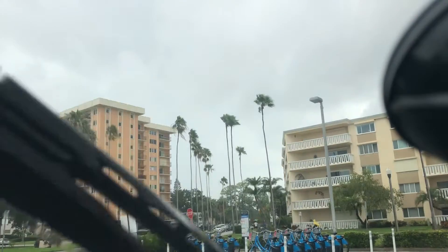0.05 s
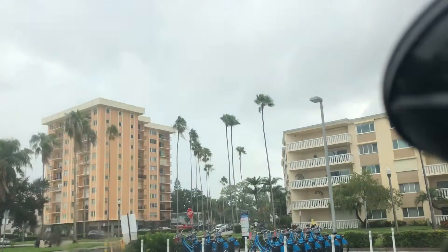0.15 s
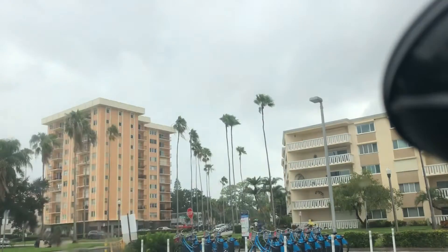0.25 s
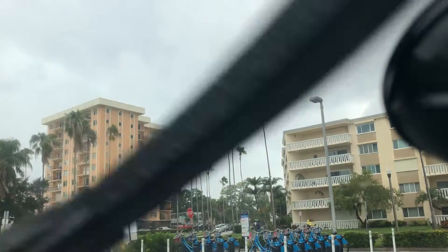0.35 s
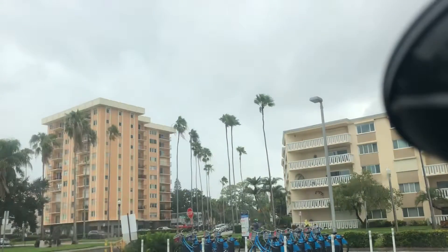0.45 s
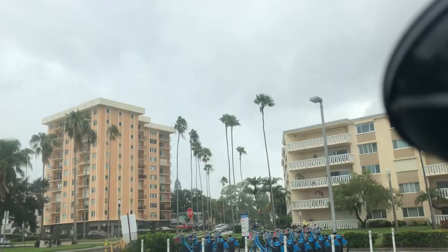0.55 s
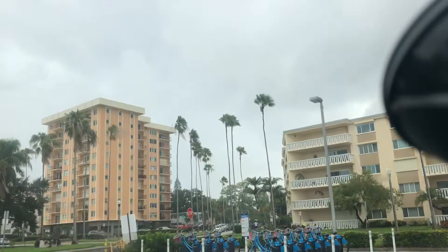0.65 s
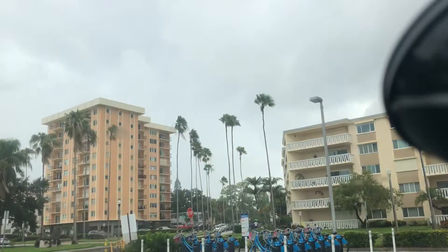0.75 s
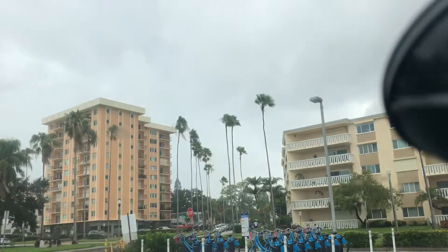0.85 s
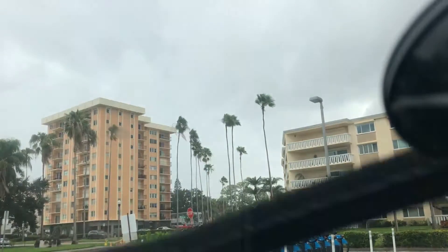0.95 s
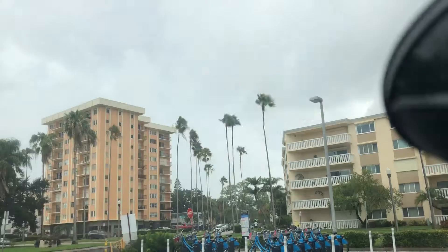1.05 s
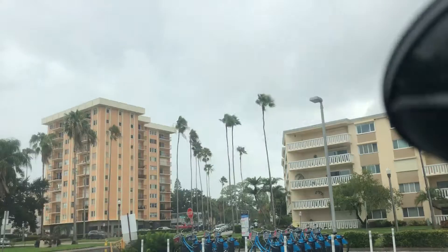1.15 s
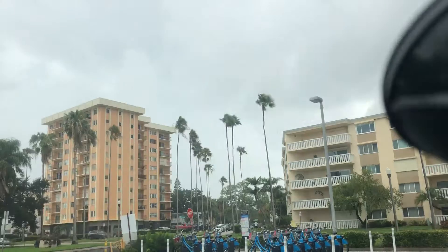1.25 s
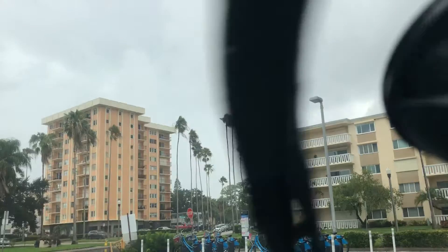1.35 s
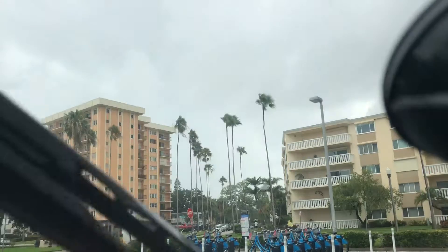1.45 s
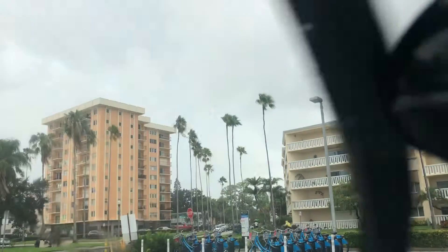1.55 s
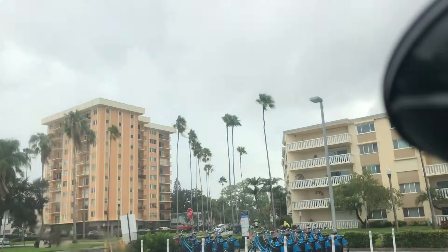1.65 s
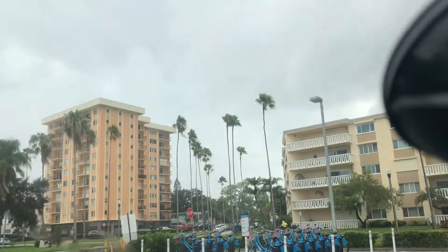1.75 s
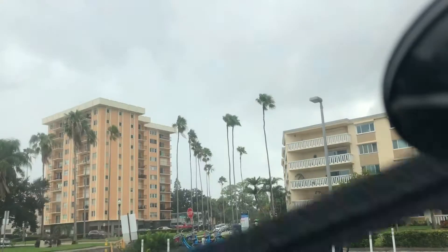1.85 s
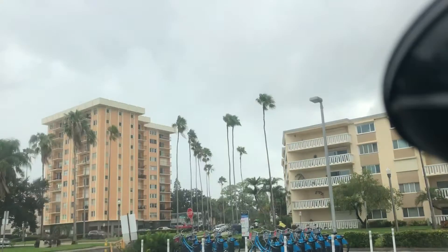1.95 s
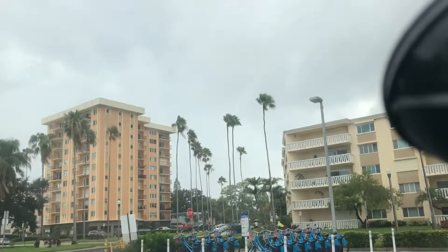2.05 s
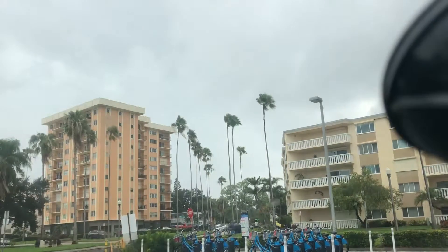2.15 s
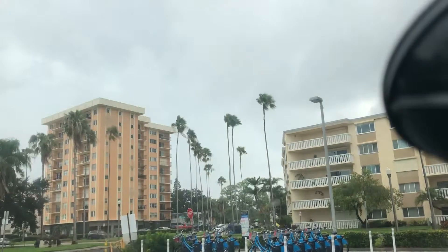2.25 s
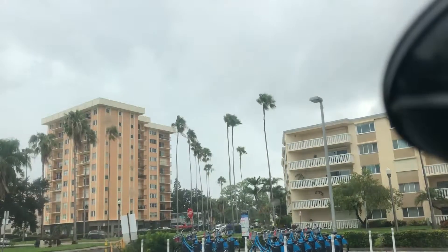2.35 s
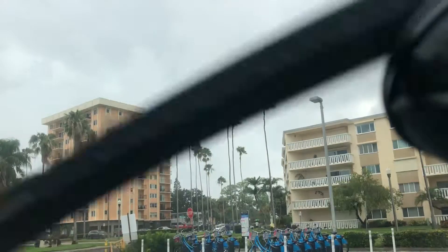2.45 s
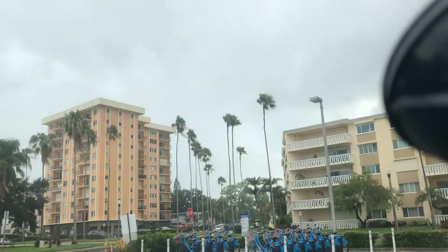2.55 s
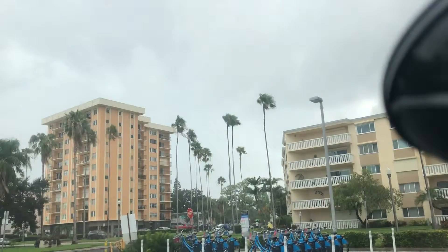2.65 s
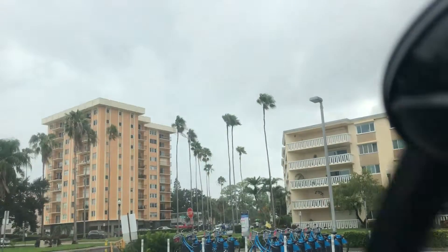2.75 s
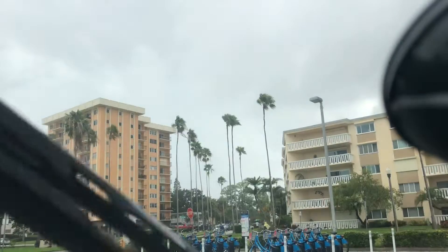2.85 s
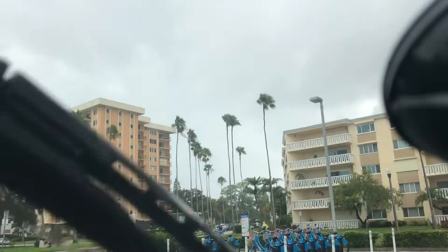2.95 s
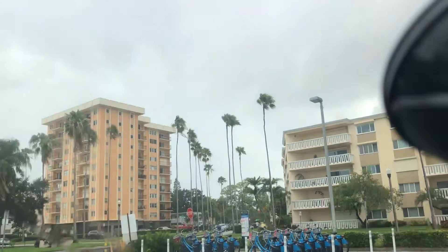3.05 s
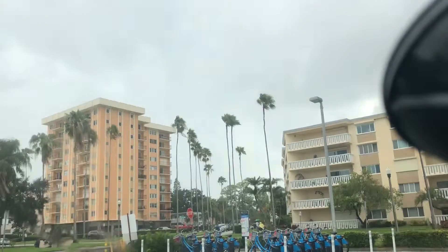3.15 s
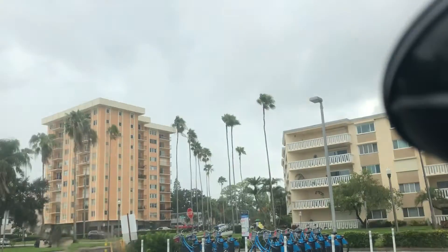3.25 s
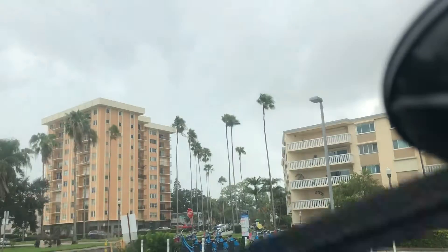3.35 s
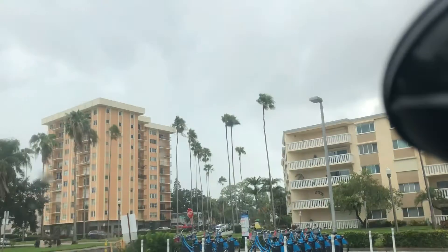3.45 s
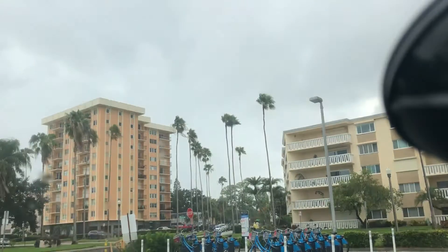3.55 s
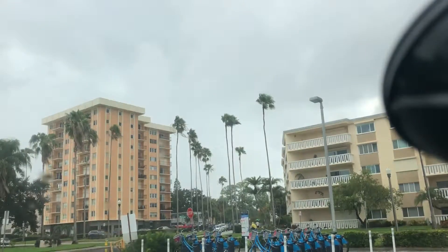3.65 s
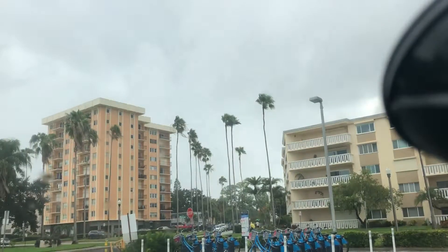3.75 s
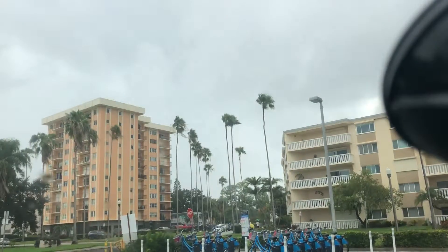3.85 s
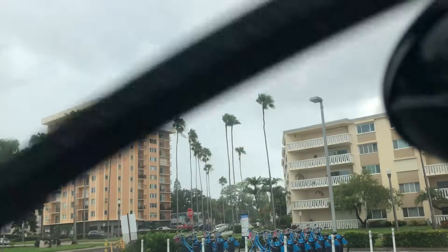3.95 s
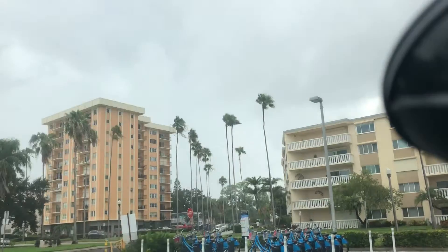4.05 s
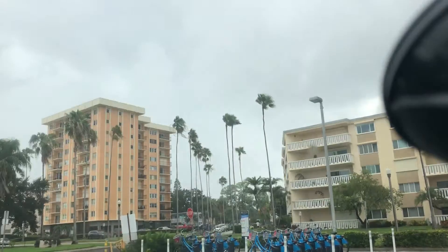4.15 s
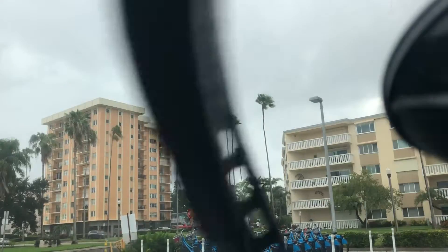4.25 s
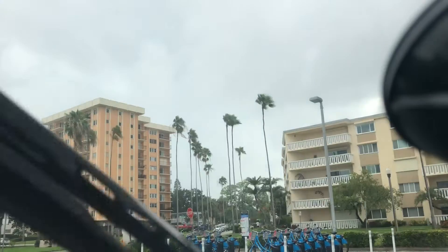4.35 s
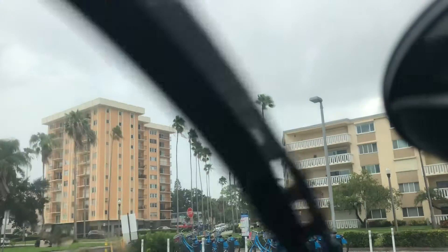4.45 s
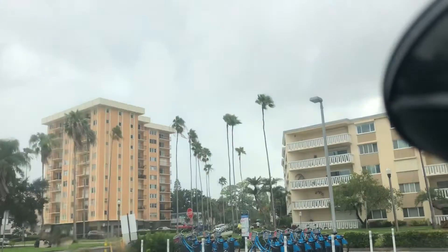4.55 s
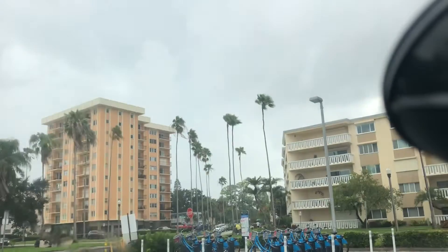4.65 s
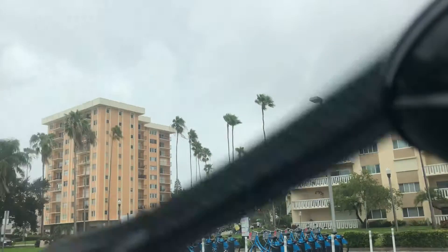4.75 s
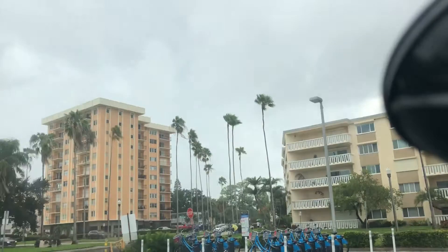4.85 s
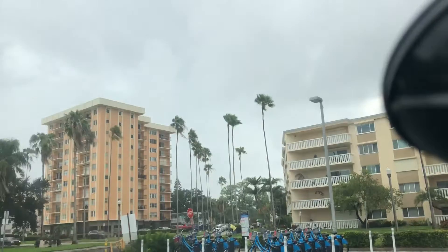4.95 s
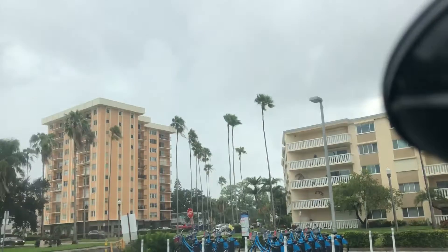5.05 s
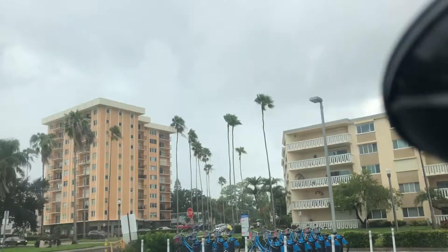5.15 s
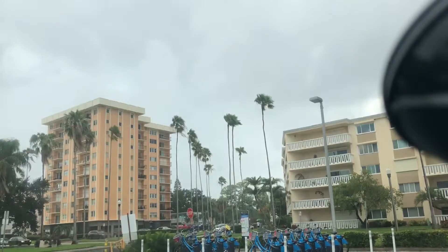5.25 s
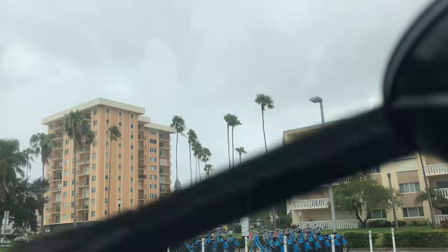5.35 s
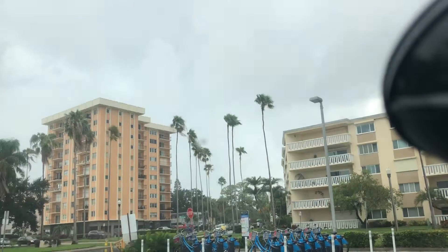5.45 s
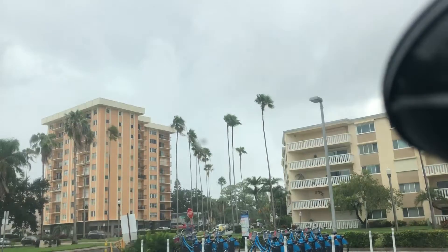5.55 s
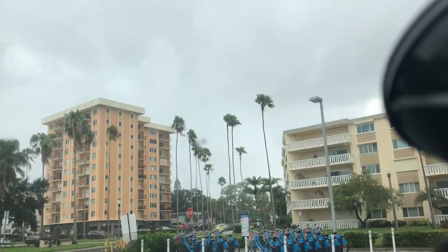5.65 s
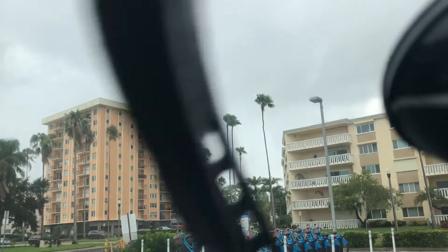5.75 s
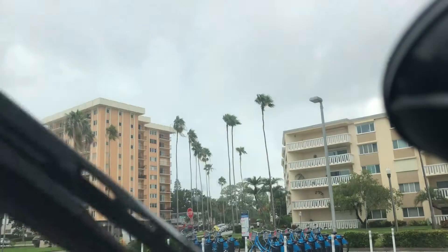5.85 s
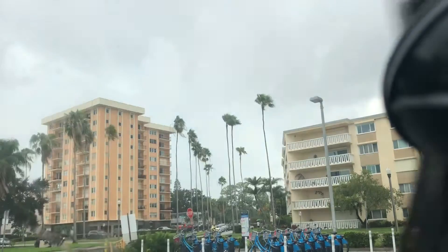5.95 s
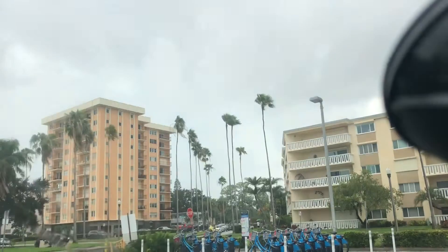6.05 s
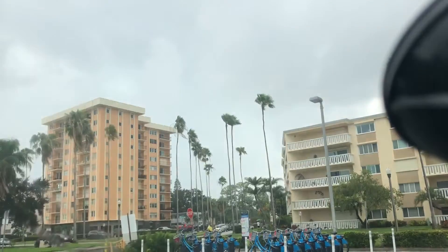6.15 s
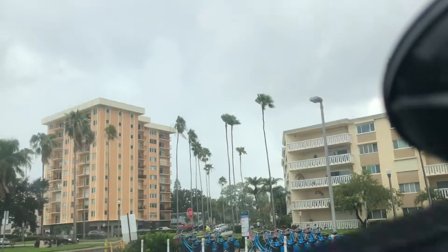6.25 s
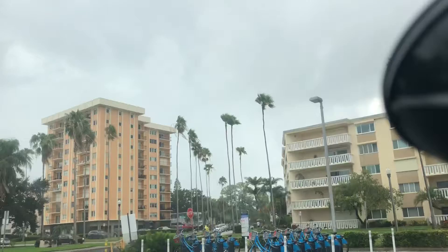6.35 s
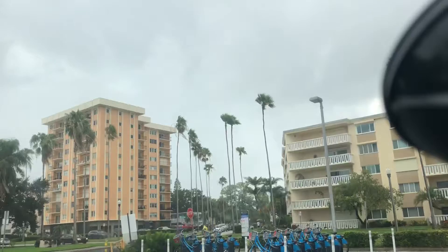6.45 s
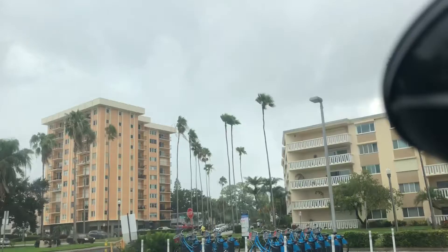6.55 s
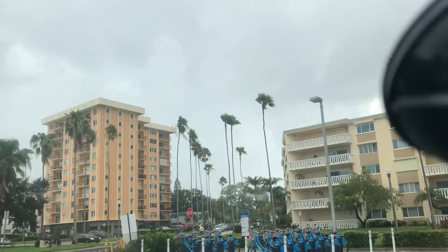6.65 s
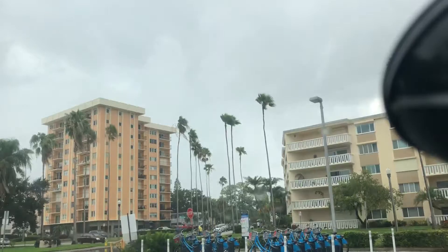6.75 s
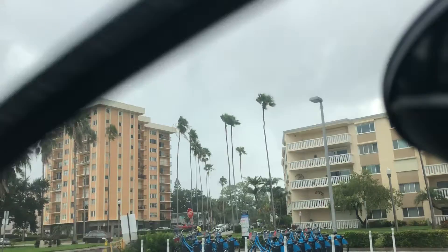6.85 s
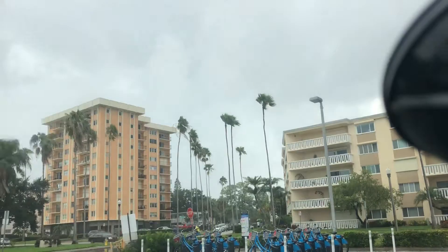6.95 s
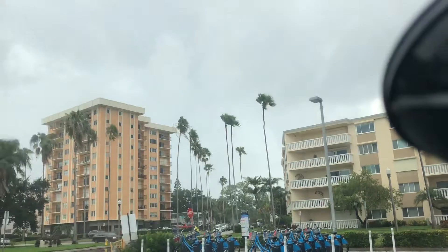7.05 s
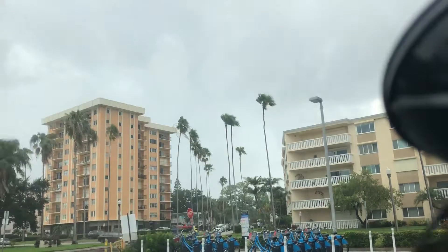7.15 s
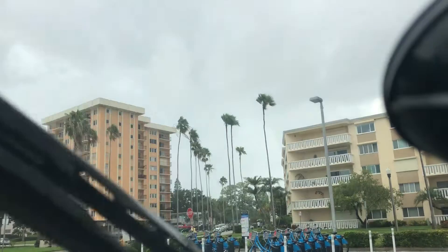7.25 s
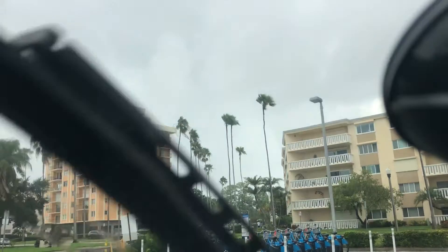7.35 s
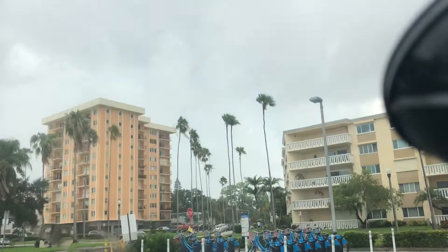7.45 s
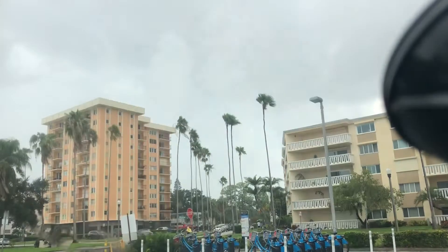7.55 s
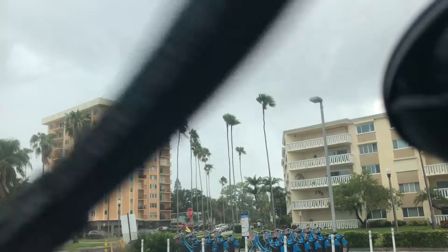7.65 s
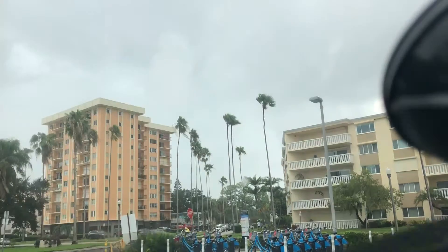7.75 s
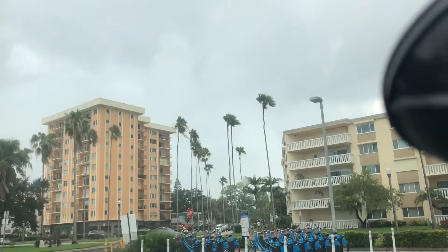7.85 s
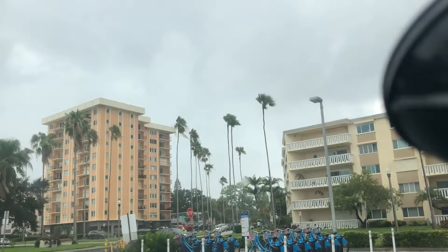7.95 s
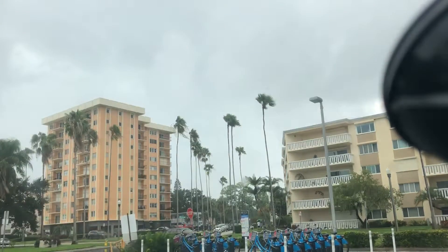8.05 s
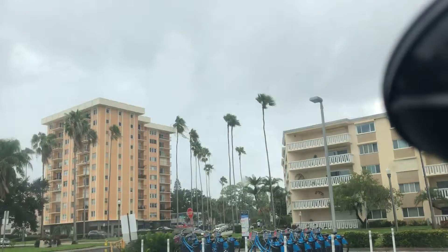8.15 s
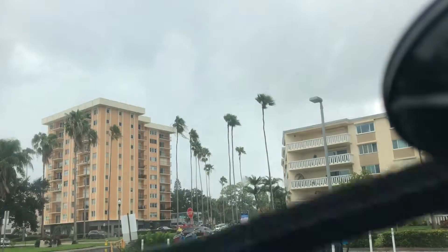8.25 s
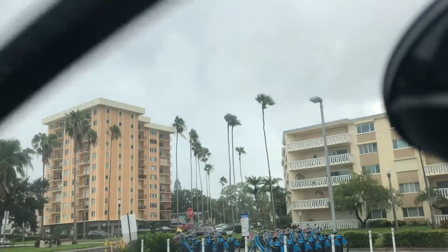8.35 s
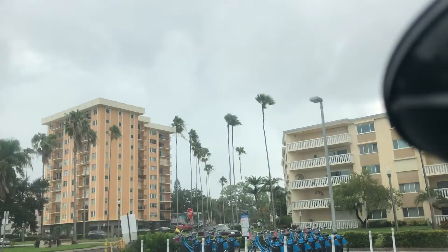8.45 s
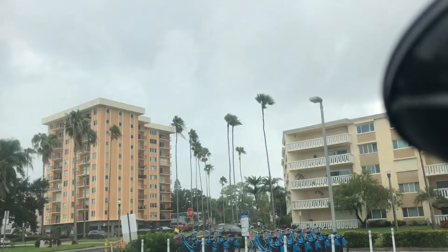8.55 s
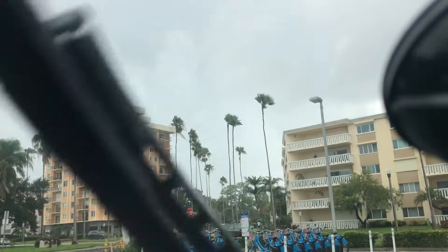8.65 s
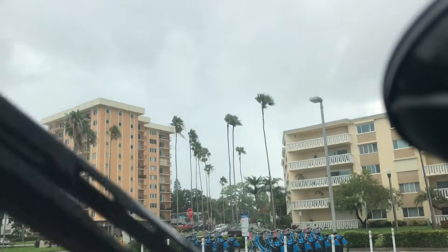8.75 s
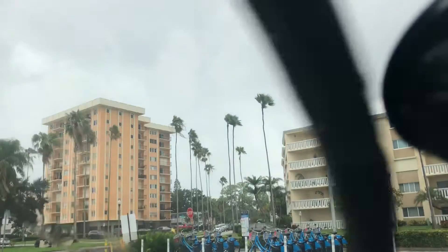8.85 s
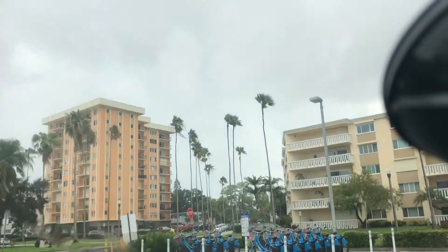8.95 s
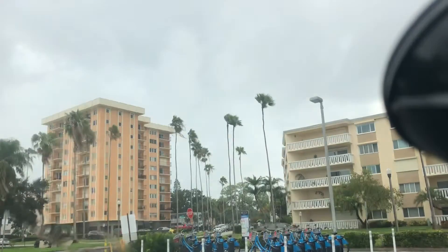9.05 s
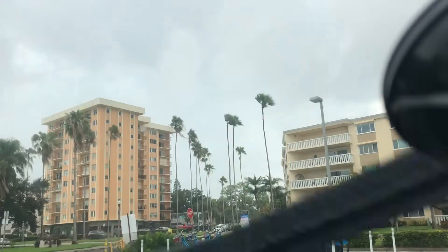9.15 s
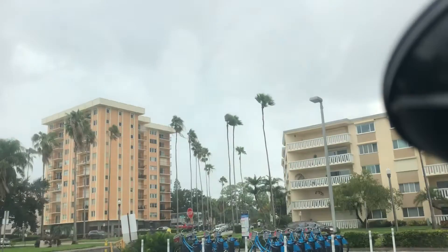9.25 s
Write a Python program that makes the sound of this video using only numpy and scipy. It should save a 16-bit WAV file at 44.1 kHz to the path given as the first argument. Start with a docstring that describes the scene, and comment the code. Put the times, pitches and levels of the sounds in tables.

```python
"""Inside a standing car, engine idling: windscreen wipers run steadily in light rain.
At each end of the sweep the wet rubber drags in stick-slip, squelches and flicks off water as it flips.
The arms knock on the glass, which booms in the cabin; at the far turn a blade also creaks.
Between turns: the idle, a soft rush of air, a few drops on the glass and, once, a faint sinking hum."""
import sys
import numpy as np
from scipy import signal
from scipy.fft import rfft, irfft, next_fast_len
from scipy.io import wavfile

SR = 44100
rng = np.random.default_rng(int(sys.argv[2]) if len(sys.argv) > 2 else 0)


def dump(signal):
    """Clip the signal to [-1, 1] and save it as 16-bit WAV at the path in sys.argv[1]."""
    limited = np.clip(np.atleast_2d(signal).T, -1, 1)
    pcm = np.round(limited * 32767).astype(np.int16)
    wavfile.write(sys.argv[1], SR, pcm)


N = 410130

FIRST_TURN_S, CYCLE_S = .1198, 1.4615  # cycle: out and back, timed from the turn at the screen's foot
FAR_AFTER_S = .4  # later offsets belong to the far turn

# Air rush spectrum: freq_hz, relative_db
AIR_SPECTRUM = [(18, -34), (30, -14), (42, -10), (52, -3.5), (75, -1.5), (110, 0.5), (220, -6.5), (340, -9),
                (470, -18), (800, -20), (1100, -23.5), (3500, -29.5), (6700, -37), (9500, -43.5),
                (15900, -54.5)]
# Cabin resonances in the rush: freq_hz, width_hz, level_db
CABIN_RESONANCES = [(205.2, 39, -54), (623.6, 46, -67), (885, 124, -65.5)]
# Engine firing rate and octave: pitch_hz, level_db
IDLE_PARTIALS = [(35, -54.5), (70, -53.5)]
# Raindrops on the glass: start_s, level_db
RAINDROPS = [(2.555, -72), (3.272, -61.5), (7.735, -59.5), (9.192, -65)]
# Water spectrum, spray and drops: freq_hz, relative_db
WATER_SPECTRUM = [(500, -13), (1500, -5.5), (2200, 4.5), (3200, 0), (5000, 6.5), (6000, -4.5), (7200, -2.5),
                  (8400, -7), (9800, -7.5), (12000, -14.5), (16000, -22)]
# Rubber scuff spectrum through the glass: freq_hz, relative_db
SCUFF_SPECTRUM = [(150, -31.5), (330, 8.5), (420, 2), (500, -0.5), (620, -3.5), (730, -7.5), (860, -6),
                  (1100, -15.5), (1400, -19.5), (2000, -29.5), (3000, -26.5), (6000, -80)]
# Rubber drags, per cycle: offset_s, length_s, level_db
CYCLE_SCUFFS = [(-.168, 0.058, -48), (-.107, 0.029, -42), (-.031, .02, -37.5), (-.008, 0.0057, -30.5),
                (.607, 0.015, -36.5), (.692, 0.032, -33), (.729, 0.024, -34.5), (.746, .007, -31)]
# Wet lip squelches, per cycle: offset_s, length_s, level_db, pitch_hz
CYCLE_SQUELCHES = [(-.141, 0.025, -49, 4600), (-.109, .006, -40, 4140), (-.093, 0.013, -51, 4450),
                   (-.04, .03, -57.5, 3440), (-.006, 0.0033, -40.5, 2270), (.607, 0.007, -46, 4800),
                   (.693, 0.028, -48.5, 4070), (.7285, 0.012, -39, 3740)]
# Water flicks, per cycle: offset_s, length_s, level_db
CYCLE_SPRAYS = [(-.129, 0.0042, -43.5), (-.109, .005, -52.5), (-.094, 0.0081, -44.5), (-.008, 0.0096, -50),
                (.605, 0.0074, -43), (.7475, 0.0065, -47)]
# Blade and arm knocks, per cycle: offset_s, impulse_db, contact_s
CYCLE_KNOCKS = [(-.151, -18.5, .0007), (-.094, -14, 0.00036), (-.0003, 2, 0.00038), (0.614, -8, 0.00049),
                (0.7132, -12, 0.00043), (.734, -14, 0.00025), (0.7504, -8, 0.00016)]
# Glass, scuttle and cabin modes: freq_hz, gain_db, t60_s, rise_s
GLASS_MODES = [(43.4, -32, 0.34, 0.0017), (92.4, -30.5, 0.39, 0.0026), (112.6, -17.5, 0.43, 0.0061),
               (142, -8.5, 0.15, 0.032), (183.4, -22.5, 0.19, 0.017), (207.2, -7.5, 0.11, 0.008),
               (239.8, 4.0, 0.054, 0.01), (284.3, -6, 0.079, 0.0075), (330, -25, 0.097, 0.0088),
               (374, -28, 0.14, 0.0043), (589, -23, 0.08, 0.00074), (749, -18.5, 0.047, 0.0021)]
# Mode weighting when struck at the far end: freq_hz, extra_db
FAR_MODE_WEIGHTS = [(45, 1.5), (110, 0.5), (141, 2.5), (183, 8), (208, 5.5), (241, -3), (290, -4),
                    (600, -3)]


def undb(db):
    """Decibels to gain."""
    return 10 ** (np.asarray(db) / 20)


def unit(x):
    """Scale to rms 1."""
    return x / np.sqrt(np.mean(x ** 2) + 1e-18)


def add(track, start_s, sound):
    """Mix a sound into the track at start_s."""
    start = int(start_s * SR)
    lo, hi = max(start, 0), min(start + len(sound), N)
    if hi > lo:
        track[lo:hi] += sound[lo - start:hi - start]


def colour(x, spectrum):
    """Filter by a spectrum, keeping the power of white noise."""
    hz, db = np.transpose(spectrum)
    size = next_fast_len(len(x))
    bins_hz = np.maximum(np.fft.rfftfreq(size, 1 / SR), 1)
    gain = unit(undb(np.interp(np.log(bins_hz), np.log(hz), db)))
    return irfft(rfft(x, size) * gain, size)[:len(x)]


def resonate(x, hz, width_hz):
    """One resonance applied twice, for steep skirts."""
    b, a = signal.iirpeak(min(hz, .45 * SR), hz / width_hz, fs=SR)
    return signal.lfilter(b, a, signal.lfilter(b, a, x))


def drift(rate_hz):
    """Slow random curve, spread near 1."""
    knots = rng.standard_normal(400)
    return np.interp(np.arange(N) / SR * rate_hz, np.arange(len(knots)), knots)


def grains(length_s, spread_db=2.5, taper=.35, grain_rate_hz=2000):
    """Tapered run of tiny noise grains of uneven size, rms 1."""
    count = max(int(length_s * SR), 32)
    scatter, noise = rng.standard_normal((2, count))
    sizes = np.repeat(undb(spread_db * scatter), int(SR / grain_rate_hz))[:count]
    return unit(noise * sizes * signal.windows.tukey(count, taper))


def slip(length_s, attack_s, release_s):
    """Stick-slip grains: swell, hold while the rubber slides, decay."""
    friction = grains(length_s=.15, taper=.02)
    t = np.arange(len(friction)) / SR
    attack = np.minimum(t / attack_s, 1) ** 2
    release = np.exp(-np.maximum(t - length_s, 0) / release_s)
    return friction * attack * release


def cycle_starts_s():
    """Times of the turns at the foot of the screen."""
    return np.arange(FIRST_TURN_S, N / SR, CYCLE_S)


def every_cycle(rows, scatter_db=1.17):
    """Repeat rows each cycle; yields start_s, random gain, remaining columns."""
    for cycle_s in cycle_starts_s():
        for offset_s, *columns in rows:
            yield cycle_s + offset_s, undb(scatter_db * rng.standard_normal()), columns


def cabin_air(rush_db=-45.5, rumble_db=-54, swell_db=4.5, flicker_db=3):
    """Steady air rush, a deep rumble that comes and goes, wavering cabin resonances."""
    air = unit(colour(rng.standard_normal(N), AIR_SPECTRUM)) * undb(rush_db)
    rumble = unit(resonate(rng.standard_normal(N), hz=65, width_hz=64))
    air += rumble * undb(rumble_db + swell_db * drift(7.1))
    for hz, width_hz, level_db in CABIN_RESONANCES:
        band = unit(resonate(rng.standard_normal(N), hz, width_hz))
        air += band * undb(level_db + flicker_db * drift(8.6))
    return air


def engine_idle(speed_spread=.0432, throb_db=1):
    """Firing rate and its octave, slightly unsteady."""
    engine_time_s = np.cumsum(1 + speed_spread * drift(8)) / SR
    out = np.zeros(N)
    for pitch_hz, level_db in IDLE_PARTIALS:
        tone = np.sqrt(2) * np.sin(2 * np.pi * pitch_hz * engine_time_s)
        out += tone * undb(level_db + throb_db * drift(7.3))
    return out


def sinking_hum(start_s=.9, length_s=.58, pitch_hz=99, sag_hz_per_s=22.7, level_db=-43.5, octave_db=-3):
    """A faint hum and its octave swell, glide down and fade."""
    out = np.zeros(N)
    t = np.arange(int(length_s * SR)) / SR
    phase = 2 * np.pi * np.cumsum(pitch_hz - sag_hz_per_s * t) / SR
    tone = np.sin(phase) + undb(octave_db) * np.sin(2 * phase)
    add(out, start_s, tone * signal.windows.tukey(len(t), .6) * undb(level_db))
    return out


def raindrops(length_s=.011):
    """Single light drops tick on the glass."""
    ticks = np.zeros(N)
    for start_s, level_db in RAINDROPS:
        add(ticks, start_s, grains(length_s) * undb(level_db))
    return colour(ticks, WATER_SPECTRUM)


def blade_creaks(offset_s=.704, length_s=.024, pitch_hz=1320, spread=.061, judder_hz=135, level_db=-45):
    """A blade judders and creaks as it leans over at the far turn."""
    out = np.zeros(N)
    for cycle_s in cycle_starts_s():
        drag = grains(length_s)
        judder = 1 - (np.arange(len(drag)) / SR * judder_hz) % 1  # each release dies before the next
        hz = pitch_hz * (1 + spread * rng.standard_normal())
        creak = resonate(np.pad(drag * judder, (0, 400)), hz, width_hz=380)
        add(out, cycle_s + offset_s, unit(creak) * undb(level_db))
    return out


def water_spray(attack_s=.0065, release_ratio=1.23):
    """The lip flips and flicks off water; longer flicks thin out more slowly."""
    flicks = np.zeros(N)
    for start_s, gain, (length_s, level_db) in every_cycle(CYCLE_SPRAYS):
        flick = slip(length_s, attack_s, release_ratio * length_s)
        add(flicks, start_s, flick * undb(level_db) * gain)
    return colour(flicks, WATER_SPECTRUM)


def lip_squelches(attack_s=.0049, release_s=.0042, ratios=(.9, 1, 1.1), spread=.049, width_hz=600):
    """The wet lip leans over; its slip drives three close resonances."""
    out = np.zeros(N)
    for start_s, gain, (length_s, level_db, pitch_hz) in every_cycle(CYCLE_SQUELCHES):
        resonances_hz = pitch_hz * rng.normal(ratios, spread)
        drag = slip(length_s, attack_s, release_s)
        lip = sum(resonate(drag, hz, width_hz) for hz in resonances_hz)
        add(out, start_s, unit(lip) * drag.std() * undb(level_db) * gain)
    return out


def rubber_scuffs(attack_s=.0044, release_s=.016):
    """Dragging rubber, heard through the glass."""
    drags = np.zeros(N)
    for start_s, gain, (length_s, level_db) in every_cycle(CYCLE_SCUFFS):
        add(drags, start_s, slip(length_s, attack_s, release_s) * undb(level_db) * gain)
    return colour(drags, SCUFF_SPECTRUM)


def glass_boom(force, far, ring_s=.7):
    """Glass and cabin modes build up and decay, weighted by the place struck."""
    t = np.arange(int(ring_s * SR)) / SR
    ring = np.zeros(len(t))
    for hz, gain_db, t60_s, rise_s in GLASS_MODES:
        place_db = np.interp(hz, *np.transpose(FAR_MODE_WEIGHTS)) if far else 0
        envelope = (1 - np.exp(-t / rise_s)) * undb(-60 * t / t60_s)
        ring += undb(gain_db + place_db) * envelope * np.sin(2 * np.pi * hz * t)
    return signal.fftconvolve(force, ring)[:N]


def arm_knocks(far, scatter_db, jitter_s, rebound_s=.02262, rebound_db=-3, rebound_contact_s=.0011):
    """Arms hit the glass at one end of the sweep and bounce once; softer contacts push longer."""
    force = np.zeros(N)
    t = np.arange(-256, 256) / SR
    rows = [row for row in CYCLE_KNOCKS if (row[0] > FAR_AFTER_S) == far]
    for start_s, gain, (impulse_db, contact_s) in every_cycle(rows, scatter_db):
        strike = (start_s, impulse_db, contact_s)
        rebound = (start_s + rebound_s, impulse_db + rebound_db, rebound_contact_s)
        for hit_s, hit_db, sigma_s in strike, rebound:
            push = np.exp(-.5 * (t / sigma_s) ** 2)
            add(force, rng.normal(hit_s, jitter_s) + t[0], push / push.sum() * undb(hit_db) * gain)
    return glass_boom(force, far)


def scene():
    """Both wiper turns over the car's hum, mono."""
    background = cabin_air() + engine_idle() + sinking_hum() + raindrops()
    rubber = blade_creaks() + water_spray() + lip_squelches() + rubber_scuffs()
    foot_knocks = arm_knocks(far=False, scatter_db=.4, jitter_s=.0001)
    far_knocks = arm_knocks(far=True, scatter_db=.5, jitter_s=.0005)
    return (background + rubber + foot_knocks + far_knocks)[None]


def record(dry, cutoff_hz=15850):
    """Steep low-pass on the top treble."""
    return signal.sosfilt(signal.ellip(10, .1, 80, cutoff_hz, fs=SR, output="sos"), dry)


dry = scene()
out = record(dry)
dump(out)
```